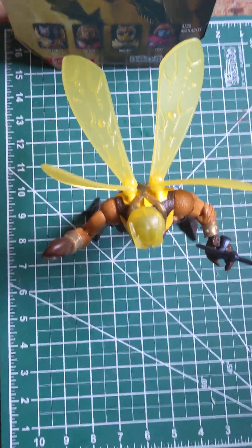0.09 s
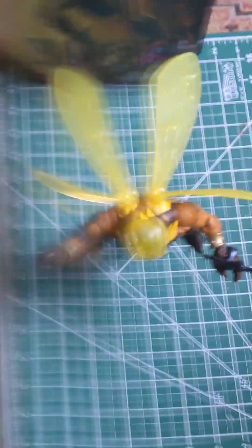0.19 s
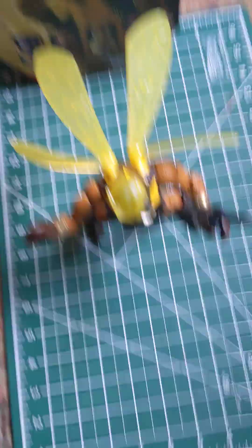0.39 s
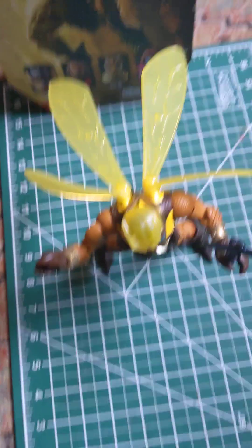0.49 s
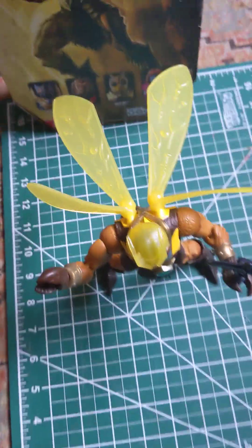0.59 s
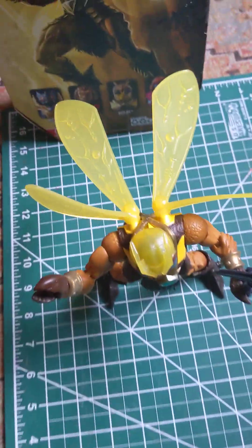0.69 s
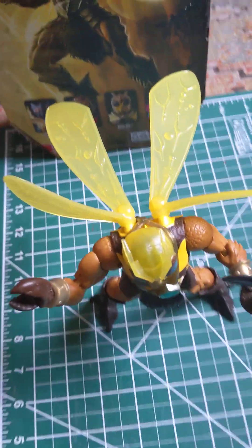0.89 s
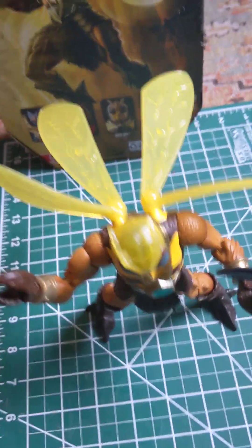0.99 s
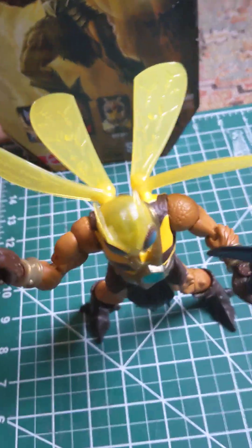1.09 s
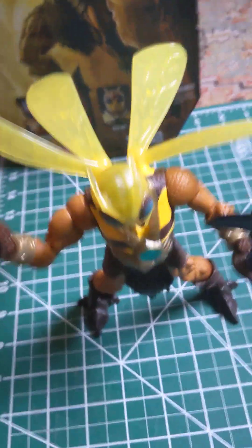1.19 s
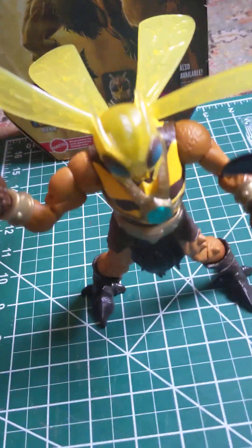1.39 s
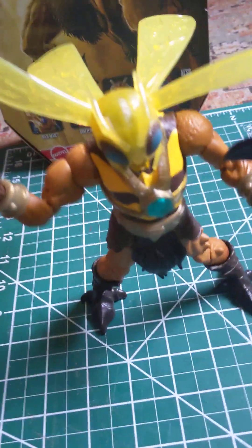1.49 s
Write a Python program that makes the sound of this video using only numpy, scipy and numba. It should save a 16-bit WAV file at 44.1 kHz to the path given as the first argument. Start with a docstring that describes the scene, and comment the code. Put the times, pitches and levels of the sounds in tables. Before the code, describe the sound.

Plastic joint clicks in rapid uneven succession, then a gritty rising squeak snaps into a hard knock and low puff; a short room ring fades to soft rumble, hiss and tiny ticks, mostly on the left.

```python
"""Plastic figure handled close by

A plastic figure is handled beside the left microphone in a small, quiet room. The grip clicks (damped modes),
then slides (stick-slip pulses through a mostly rising band-pass), ending in a noise-burst knock and a puff of air.
The room rings briefly (decaying noise), thin sines linger, and faint ticks, a tap and weaker puffs follow.
Steady coloured noise gives the rumble and hiss behind."""
import sys
import numpy as np
from scipy import signal
from scipy.fft import rfft, irfft
from scipy.io import wavfile
from scipy.ndimage import uniform_filter1d
from numba import njit

SR = 44100
rng = np.random.default_rng(int(sys.argv[2]) if len(sys.argv) > 2 else 0)


def to_wav(s):
    """Save 16-bit WAV."""
    ch = np.atleast_2d(s).T  # columns
    pcm = np.round(np.clip(ch, -1, 1) * 32767)  # PCM
    wavfile.write(sys.argv[1], SR, pcm.astype(np.int16))


N = 66150
T = np.arange(N) / SR  # [s]

# Levels are relative; every colour is scaled to rms 1. *_RIGHT_DB: right side relative to left.
# slide: friction hiss (time [s], level [dB])
SLIDE_LEVEL = [(0, -49), (0.06, -43), (0.13, -40.5), (0.18, -36), (0.215, -29.5), (0.245, -19),
               (0.275, -20), (0.297, -12.5), (0.304, -20), (0.312, -65)]
# slide: hiss colour (frequency [Hz], level [dB])
SLIDE_COLOUR = [(60, -26), (250, -2.5), (700, 1.5), (1500, 1), (2500, -3.5), (4600, 1), (7000, -11),
                (9500, -14.5), (15500, -23.5)]
# hollow under the grip (time [s], resonance [Hz], level [dB])
HOLLOW = [(0.21, 700, -52.5), (0.245, 950, -28), (0.260, 1296, -16), (0.266, 1450, -8), (0.277, 1350, -11),
          (0.283, 2120, -11), (0.288, 3000, -17.5), (0.296, 3280, -25), (0.303, 3966, -22),
          (0.309, 4000, -45)]
HOLLOW_WIDTH_HZ, SLIDE_RIGHT_DB = 750, -36
GRAINS_PER_S, GRAIN_SPREAD_DB = 7000, 3  # mean rate, standard deviation
JUDDER_PER_S, JUDDER_DB = 300, 4  # spread before smoothing
HISS_JUDDER_EXPONENT = 0.6  # share of the judder, in dB, that the hiss follows

# hardest catches of the slide (time [s], pitch [Hz], level [dB])
CATCHES = [(0.2468, 925, -10.5), (0.2524, 1047, -10), (0.2669, 1500, -9), (0.276, 1400, -9),
           (0.2815, 2000, -9), (0.2862, 570, -8), (0.286, 3900, -11.5), (0.2892, 2934, -13),
           (0.2943, 3230, -7), (0.2969, 2200, -6)]
CATCH_HALF_LENGTH_S, CATCH_CHIRP = 0.0012, .08  # chirp: largest share of the quadratic phase

# last scrape before the knock (time [s], level [dB])
SCRAPE_LEVEL = [(0.26, -60), (0.28, -34.5), (0.287, -27), (0.299, -34), (0.306, -50.5)]
# scrape colour (frequency [Hz], level [dB])
SCRAPE_COLOUR = [(30, 14.5), (120, 1.5), (300, 1.5), (800, 5.5), (2000, -6.5), (5000, -15), (11000, -18),
                 (16000, -23)]
SCRAPE_LEFT_DB = 10  # relative to right

# grip clicks (time [s], dull tock [dB], bright tick before halving [dB], crackle [dB],
# crackle decay [s], own ring [Hz])
CLICKS = [(0.0021, -39, -25.5, -42, .0007, 4700), (0.0307, -7.5, -16, -33, 0.0021, 3200),
          (0.0499, -14, -26, -41.5, 0.0011, 4700), (0.0697, -44.5, -18.5, -22.5, 0.0013, 2400),
          (0.0802, -11, -26.5, -30.5, 0.00098, 4800), (0.1063, -37.5, -12.5, -16, .0003, 3700),
          (0.1622, -16.5, -26.5, -50.5, .001, 3900), (0.1691, -44.5, -21, -47, .001, 4000),
          (0.1906, -30.5, -20.5, -47.5, .001, 3900), (0.1928, -17, -28, -46, .001, 3000),
          (0.2026, -48, -17.5, -31.5, 0.0016, 1550)]
# modes of the dull tock (frequency [Hz], level [dB], T60 [s])
TOCK_MODES = [(310, -15.5, 0.01), (620, -3.5, 0.0099), (800, -2, 0.0083), (1270, -3, 0.0023),
              (1570, -14, .004)]
# modes of the bright tick (frequency [Hz], level [dB], T60 [s])
TICK_MODES = [(2400, -9.5, .005), (3200, -2, 0.01), (4210, 7.5, 0.0037), (4900, 2.5, 0.0027),
              (5700, -45.5, .003), (8300, -9.5, .003)]
# top-end crackle colour (frequency [Hz], level [dB])
CRACKLE_COLOUR = [(300, -23.5), (2000, 6.5), (5000, -1), (8500, 15), (11000, -2.5), (16000, -3)]
CLICK_RIGHT_DB, CRACKLE_RIGHT_DB = -26.5, -23
OWN_RING_DB, OWN_RING_T60_S = -2, .010
CONTACT_CYCLES = 0.46  # build-up time of a mode, in its periods

# knock and bounce (time [s], level [dB], decay [s])
KNOCKS = [(0.3016, -5.5, 0.0017), (0.3035, -11, .0012)]
# knock colour (frequency [Hz], level [dB])
KNOCK_COLOUR = [(100, -31.5), (600, -2.5), (1800, -5.5), (4000, 3), (6500, -2.5), (8500, -5.5), (11500, -1),
                (16000, -3.5)]
KNOCK_LAG_S, KNOCK_RIGHT_DB = 0.00049, 2.0

# air puffs (time [s], level [dB], decay [s], rise [s])
PUFFS = [(0.304, -5.5, 0.011, 0.0024), (0.402, -29, 0.048, 0.011), (0.8837, -26, 0.0092, 0.000069)]
PORT_LOW_HZ, PUFF_RIGHT_DB = 6.4, -27.5

# faint settling ticks (time [s], level before touch halving [dB], own ring [Hz])
TICKS = [(0.459, -33.5, 3870), (0.4990, -46, 5000), (0.5318, -47, 5000), (0.5465, -47.5, 4900),
         (0.5550, -43.5, 4700), (0.5697, -38, 4900), (1.102, -43.5, 2200), (1.247, -43.5, 2000),
         (1.3240, -49.5, 2200)]
TICK_FIZZ_DB, TICK_RIGHT_DB = -20, -23
FAINT_BODY_DB = -4  # TICK_MODES in a faint touch
# tap colour (frequency [Hz], level [dB])
TAP_COLOUR = [(100, -6), (300, 4), (1000, 1.5), (3000, -9.5), (8000, -23), (16000, -29)]
TAP_S, TAP_DB, TAP_RIGHT_DB = .8834, -38.5, -23
TAP_EDGE_DB, TAP_EDGE_DECAY_S = -29.5, 0.0002  # sharp front

# thin tones (frequency [Hz], level [dB], held until [s], decay [s])
TONES = [(7741, -70, 0.78, .04), (8387, -68, 0.47, .06)]
TONE_START_S, TONE_RIGHT_DB = .305, -16

# room tail colour (frequency [Hz], level [dB])
ROOM_COLOUR = [(100, -14), (520, -4), (1100, -6), (2000, -0.5), (3000, 0), (4500, -8), (7000, -5.5),
               (12000, -6.5), (16000, -12.5)]
# early reflections, one entry per side: left, right (level [dB])
EARLY_DB = [-1.5, -9]
ROOM_DB, EARLY_DECAY_S, RUB_WET_DB = -13.5, 0.013, -28.5
SPLIT_HZ, ROOM_T60_S, TREBLE_T60_S = 7000, 0.3, 0.17  # T60 below and above the split

# left background colour (frequency [Hz], level [dB])
AIR_LEFT = [(20, 0), (45, 0.5), (140, 4.5), (240, -5), (360, -12), (650, -6), (1200, -15.5), (2000, -18),
            (4500, -27), (7000, -37.5), (12000, -37), (15500, -45)]
# right background colour (frequency [Hz], level [dB])
AIR_RIGHT = [(20, -7.5), (45, 3.5), (140, 0.5), (240, -1), (360, -14), (650, -12.5), (1200, -16),
             (2000, -17.5), (4500, -24.5), (7000, -36), (12000, -33.5), (15500, -38.5)]
# background (time [s], left level [dB], right level [dB])
AIR_LEVEL = [(0, -51.5, -52.5), (0.5, -51.5, -54.5), (0.75, -49, -53), (1.05, -48, -52), (1.5, -48, -50.5)]
# faint extra hiss, left (time [s], level [dB])
HISS_LEVEL = [(0.42, -67.5), (0.6, -67), (0.86, -62), (0.9, -78)]
# extra hiss colour (frequency [Hz], level [dB])
HISS_COLOUR = [(500, -10), (4500, 2), (7000, -6), (15500, -6.5)]
TOP_HZ = 15900


def slide():
    """Uneven stick-slip friction hisses and rings a hollow of mostly rising pitch as the grip opens."""
    grip, hz = judder(), curve(HOLLOW)
    hiss = swell(SLIDE_LEVEL) * colour(grip ** HISS_JUDDER_EXPONENT * slips(), SLIDE_COLOUR)
    narrow = svf(grip * slips(), hz, float(HOLLOW_WIDTH_HZ))
    hollow = unit(svf(narrow, hz, 2. * HOLLOW_WIDTH_HZ))
    rounded = unit(np.tanh(.5 * hollow))
    return leftish(hiss + swell(HOLLOW, axis=2) * rounded, SLIDE_RIGHT_DB)


def judder():
    """Random gain held for a few milliseconds and slewed."""
    hold = int(SR / JUDDER_PER_S)
    steps = rng.standard_normal(N)[np.arange(N) // hold]
    return amp(JUDDER_DB * uniform_filter1d(steps, hold // 2))


def slips():
    """Dense stick-slip pulses of random time, size and sign."""
    hits = rng.random(N) < GRAINS_PER_S / SR
    sizes = amp(GRAIN_SPREAD_DB * rng.standard_normal(N))
    return hits * sizes * rng.choice([-1, 1], N)


@njit
def svf(x, hz, width):
    """State-variable band-pass with a moving centre."""
    y, band, low = np.empty(len(x)), 0., 0.
    for i in range(len(x)):
        g, k = np.tan(np.pi * hz[i] / SR), width / hz[i]
        v = (band + g * (x[i] - low)) / (1 + g * (g + k))
        band, low, y[i] = 2 * v - band, low + 2 * g * v, k * v
    return y


def catches():
    """Hardest catches of the slide: brief Gaussian squeaks, each sliding in pitch."""
    out = 0
    bends = rng.uniform(-1, 1, (len(CATCHES), 2))
    for (start, hz, db), (chirp, phase) in zip(CATCHES, bends):
        age = np.clip((T - start) / CATCH_HALF_LENGTH_S, -6, 6)
        turns = hz * CATCH_HALF_LENGTH_S * (age + CATCH_CHIRP * chirp * age ** 2)
        out = out + amp(db) * np.exp(-age ** 2) * np.sin(2 * np.pi * turns + np.pi * phase)
    return leftish(out, SLIDE_RIGHT_DB)


def scrape():
    """Short, heavier friction noise on both sides as the grip lets go."""
    left = amp(SCRAPE_LEFT_DB) * noise(SCRAPE_COLOUR)
    return swell(SCRAPE_LEVEL) * np.array([left, noise(SCRAPE_COLOUR)])


def clicks():
    """Single slips of the grip: modal tock, modal tick with its own pitch, speck of crackle noise."""
    tocks, snaps, bursts = 0, 0, 0
    for start, tock_db, tick_db, crackle_db, decay, hz in CLICKS:
        tocks = tocks + amp(tock_db) * ring(start, TOCK_MODES)
        modes = TICK_MODES + [(hz, OWN_RING_DB, OWN_RING_T60_S)]
        snaps = snaps + amp(tick_db) * ring(start, modes) / 2
        bursts = bursts + amp(crackle_db) * fade(start, decay)
    body = low_cut(tocks, hz=261.8) + low_cut(snaps, hz=1190)
    crackle = low_cut(noise(CRACKLE_COLOUR) * bursts, hz=400)
    return leftish(body, CLICK_RIGHT_DB) + leftish(crackle, CRACKLE_RIGHT_DB)


def ring(start, modes):
    """Damped modes pushed by one short, soft contact."""
    age, out = np.maximum(T - start, 0), 0
    for hz, db, t60 in modes:
        turns = hz * (1 + .02 * rng.standard_normal()) * age  # 2 % random detune
        build = np.sin(np.pi / 2 * np.minimum(turns / CONTACT_CYCLES, 1)) ** 2
        decay = fade(start, t60 / np.log(1000))
        out = out + amp(db) * build * decay * np.sin(2 * np.pi * turns)
    return out


def knock():
    """Hard plastic cracks and bounces once: decaying noise, later on the right."""
    def side(lag):
        """Crack and bounce after a lag in seconds."""
        hits = sum(amp(db) * fade(start + lag, decay) for start, db, decay in KNOCKS)
        return noise(KNOCK_COLOUR) * hits
    return np.array([side(0), amp(KNOCK_RIGHT_DB) * side(KNOCK_LAG_S)])


def puffs():
    """Air pushes, almost only left: rise and decay, then a slow swing back from the high-pass."""
    push = 0
    for start, db, decay, rise in PUFFS:
        push = push + amp(db) * (fade(start, decay) - fade(start, rise))
    return leftish(low_cut(push, PORT_LOW_HZ), PUFF_RIGHT_DB)


def ticks():
    """Faint modal ticks with noise fizz, and one small, crisp noise tap."""
    fizz = amp(TICK_FIZZ_DB) * noise(CRACKLE_COLOUR)
    body = 0
    for start, db, hz in TICKS:
        own = ring(start, [(hz, OWN_RING_DB, OWN_RING_T60_S)])
        touch = own + amp(FAINT_BODY_DB) * ring(start, TICK_MODES)
        body = body + amp(db) * (touch / 2 + fade(start, 0.00093) * fizz)
    tap = amp(TAP_DB) * fade(TAP_S, 0.0024) * noise(TAP_COLOUR)
    edge = amp(TAP_EDGE_DB) * fade(TAP_S, TAP_EDGE_DECAY_S)
    return leftish(body, TICK_RIGHT_DB) + leftish(tap + edge, TAP_RIGHT_DB)


def tones():
    """Thin high sines, held after the knock, then decaying."""
    out = 0
    for hz, db, until, decay in TONES:
        hold = np.exp(-np.maximum(T - until, 0) / decay)
        out = out + amp(db) * hold * np.sin(2 * np.pi * hz * T)
    return leftish(out * (T > TONE_START_S), TONE_RIGHT_DB)


def room(x):
    """Early reflections from the table, then a short diffuse tail whose treble dies first."""
    out = []
    hz = 1 + np.arange(N // 2 + 1) * SR / N  # +1 avoids division by zero
    for early_db in EARLY_DB:
        diffuse = noise(ROOM_COLOUR)
        treble = irfft(rfft(diffuse) / (1 + (SPLIT_HZ / hz) ** 4), N)
        tail = (diffuse - treble) * fade(0.00606, ROOM_T60_S / np.log(1000))
        tail = tail + treble * fade(0.007, TREBLE_T60_S / np.log(1000))
        early = fade(.003, EARLY_DECAY_S) * rng.standard_normal(N)
        response = (amp(ROOM_DB) * unit(tail) + amp(early_db) * unit(early)) / np.sqrt(N)
        out.append(signal.fftconvolve(x, response)[:N])
    return np.array(out)


def air():
    """Room rumble and hiss as coloured noise; extra left hiss until about the tap."""
    left = amp(curve(AIR_LEVEL)) * noise(AIR_LEFT) + swell(HISS_LEVEL) * noise(HISS_COLOUR)
    right = amp(curve(AIR_LEVEL, axis=2)) * noise(AIR_RIGHT)
    return np.array([left, right])


def amp(db):
    """Decibels to gain."""
    return 10 ** (np.asarray(db) / 20)


def unit(x):
    """Scale to rms 1."""
    return x / np.sqrt(np.mean(x ** 2))


def curve(rows, axis=1):
    """One table column, linear in time."""
    rows = np.array(rows)
    return np.interp(T, rows[:, 0], rows[:, axis])


def swell(rows, axis=1):
    """Gain from a dB column, silent outside its span."""
    return amp(curve(rows, axis=axis)) * (T >= rows[0][0]) * (T <= rows[-1][0])


def fade(start, decay):
    """Sudden onset, exponential decay."""
    return (T >= start) * np.exp(-np.maximum(T - start, 0) / decay)


def colour(x, points):
    """Filter by (Hz, dB) points, linear in log frequency; rms 1."""
    hz, db = np.array(points).T
    f = np.maximum(np.arange(N // 2 + 1) * SR / N, 1)
    gain = amp(np.interp(np.log(f), np.log(hz), db))
    return unit(irfft(rfft(x) * gain, N))


def noise(points):
    """Coloured Gaussian noise; rms 1."""
    return colour(rng.standard_normal(N), points)


def low_cut(x, hz):
    """Second-order high-pass."""
    return signal.sosfilt(signal.butter(2, hz, "high", fs=SR, output="sos"), x)


def leftish(x, right_db):
    """Full level left, scaled copy right."""
    return np.array([x, amp(right_db) * x])


def scene():
    """Close handling, knock, their room sound, and the background."""
    close = clicks() + slide() + catches() + scrape()
    hit = knock()
    wet = room(hit[0] + amp(RUB_WET_DB) * close[0]) + room(hit[1])
    return close + hit + wet / np.sqrt(2) + ticks() + puffs() + tones() + air()


def record(dry):
    """Round the loudest peaks by tanh, then low-pass steeply."""
    top_cut = signal.ellip(8, .2, 70, TOP_HZ, fs=SR, output="sos")
    return signal.sosfilt(top_cut, np.tanh(dry))


dry = scene()
out = record(dry)
to_wav(out)
```